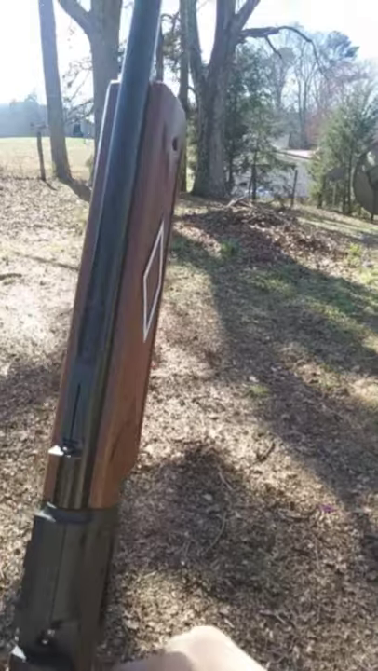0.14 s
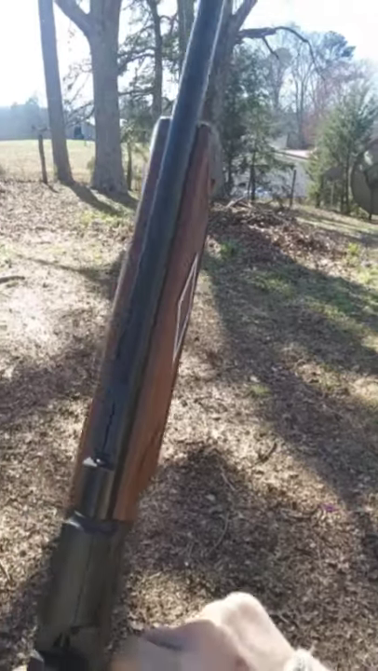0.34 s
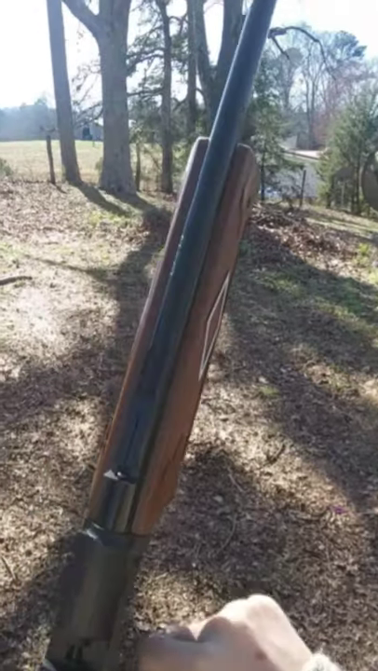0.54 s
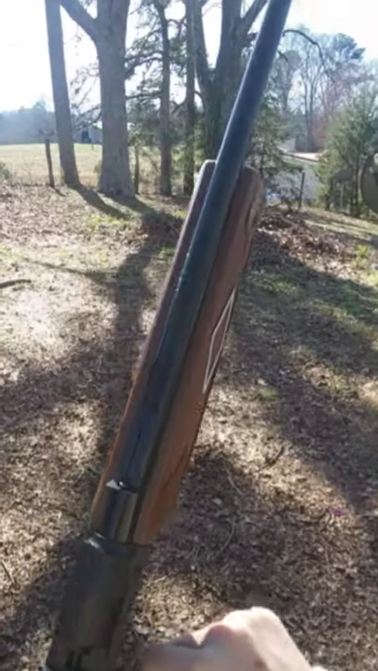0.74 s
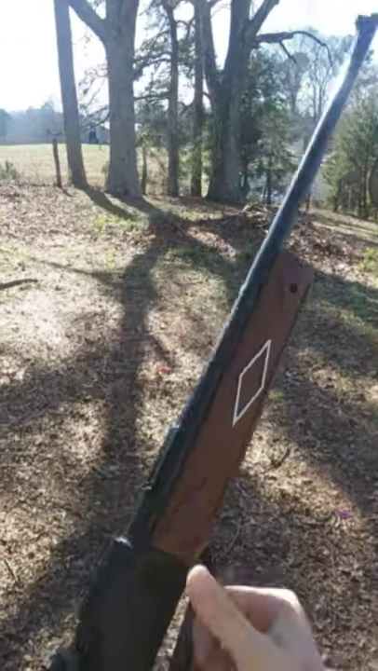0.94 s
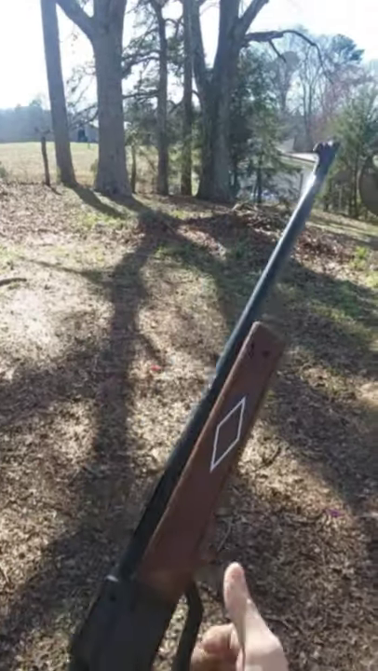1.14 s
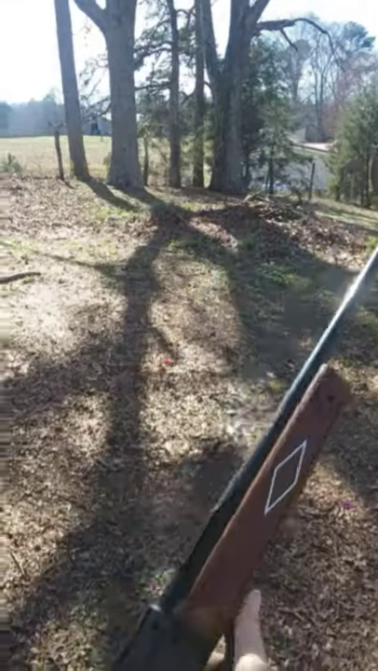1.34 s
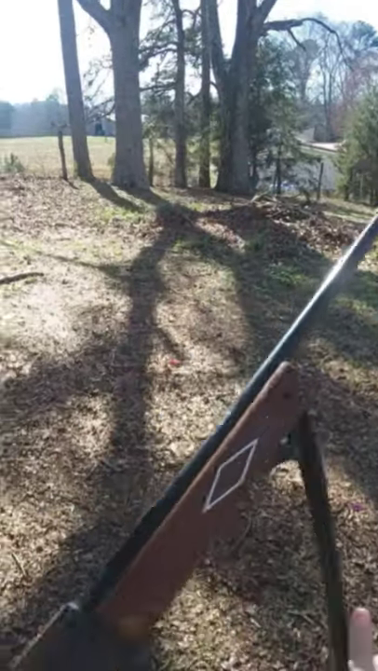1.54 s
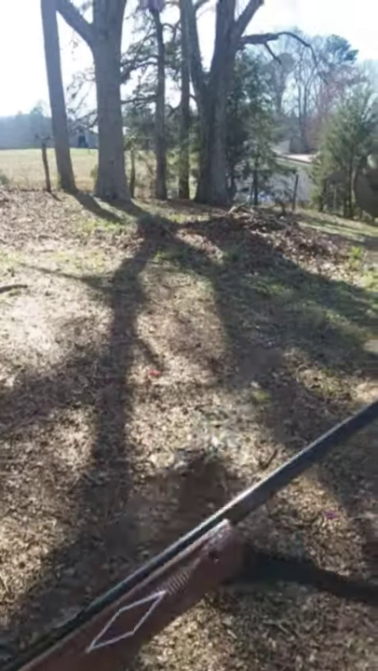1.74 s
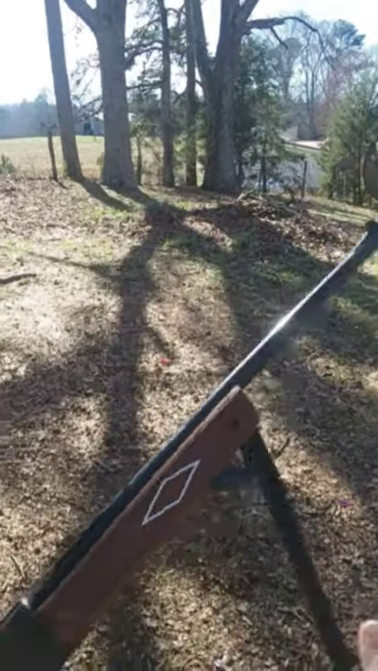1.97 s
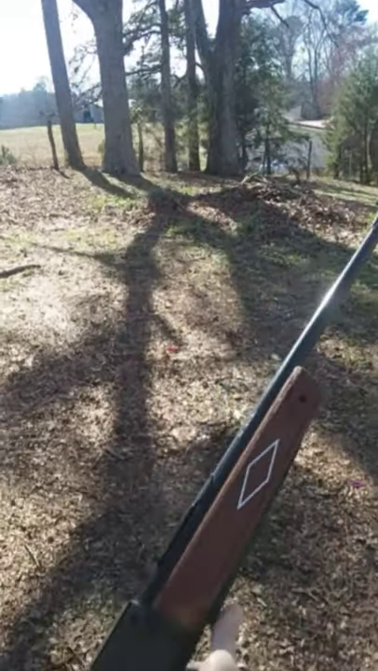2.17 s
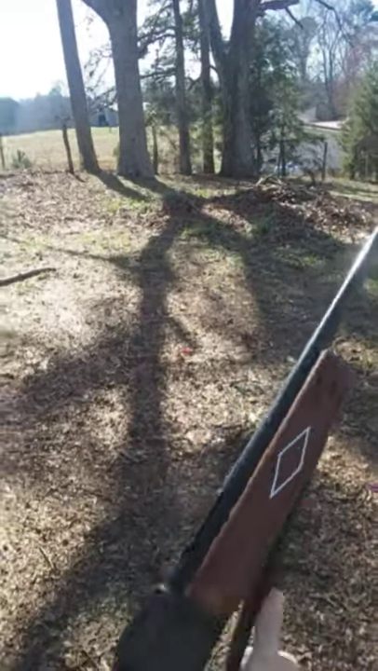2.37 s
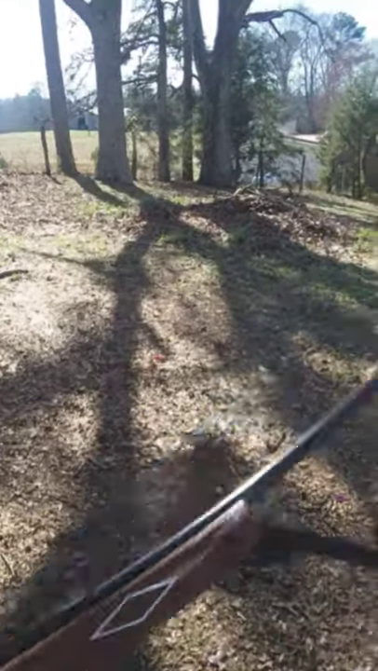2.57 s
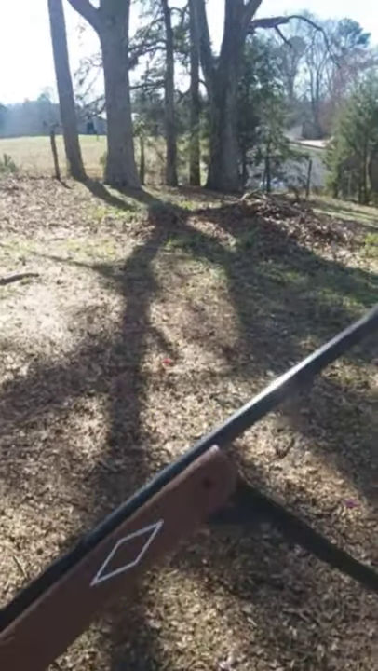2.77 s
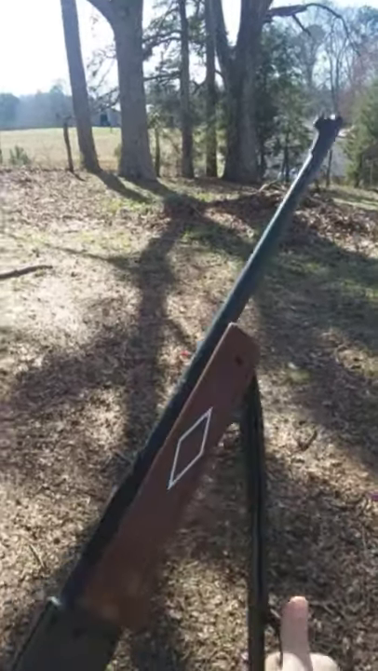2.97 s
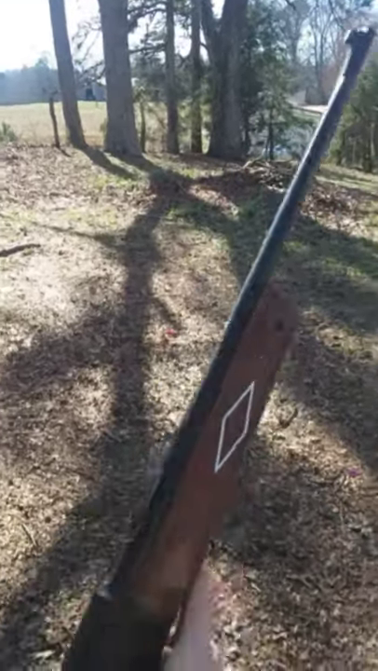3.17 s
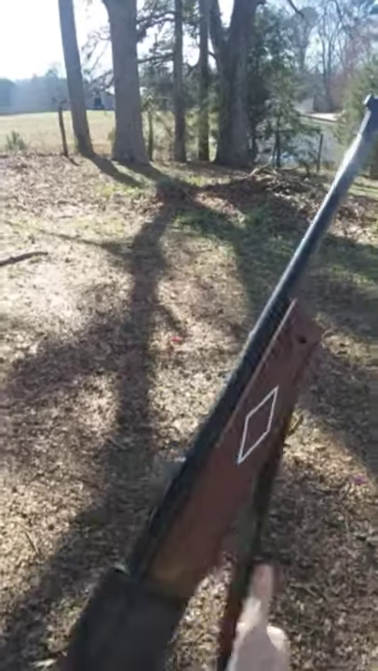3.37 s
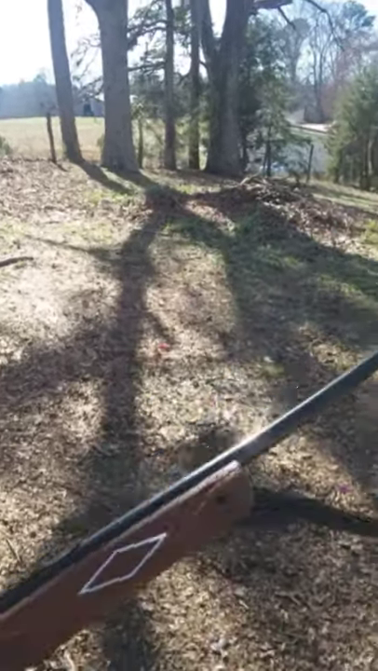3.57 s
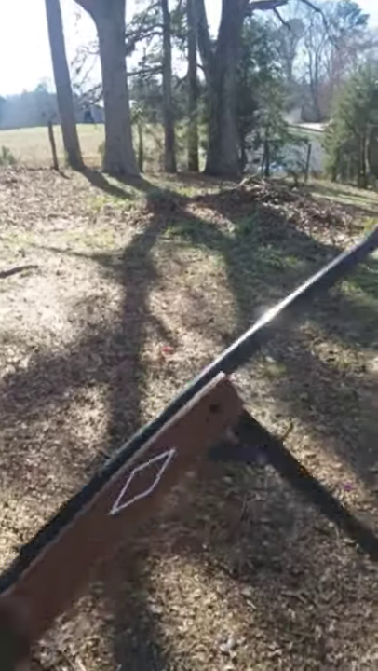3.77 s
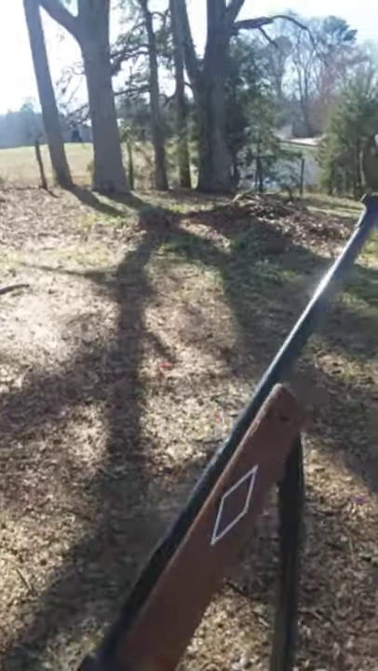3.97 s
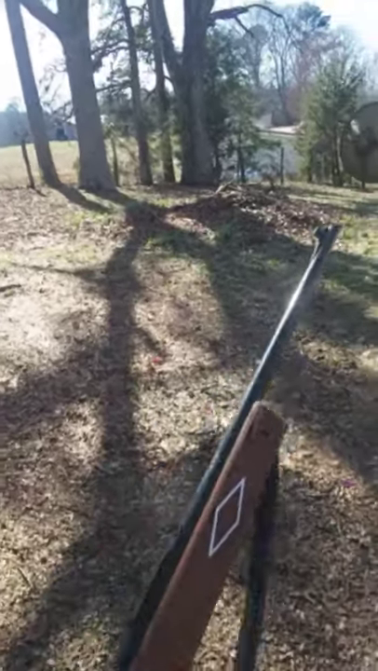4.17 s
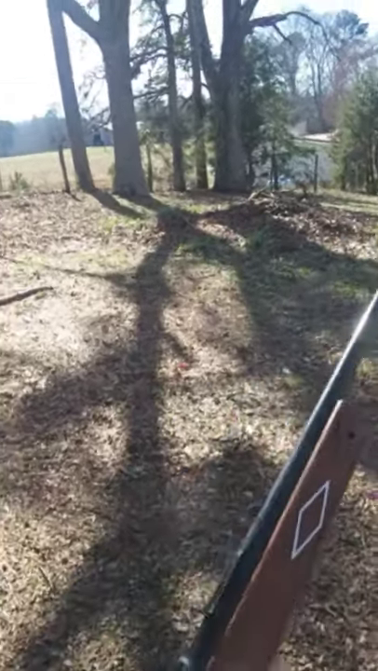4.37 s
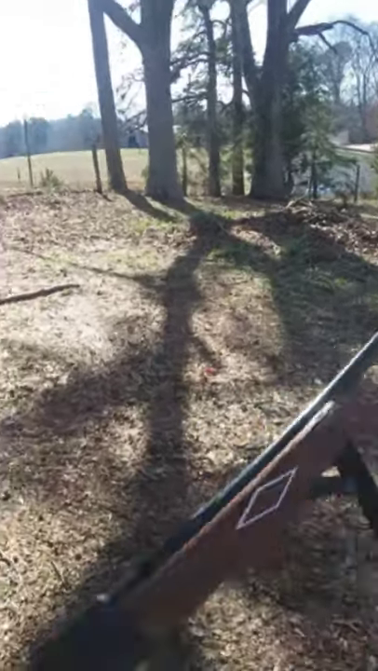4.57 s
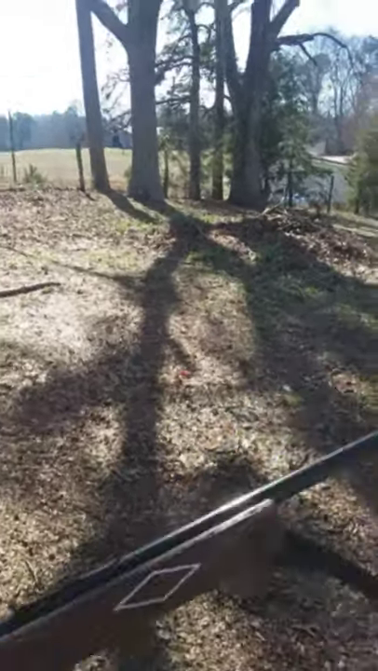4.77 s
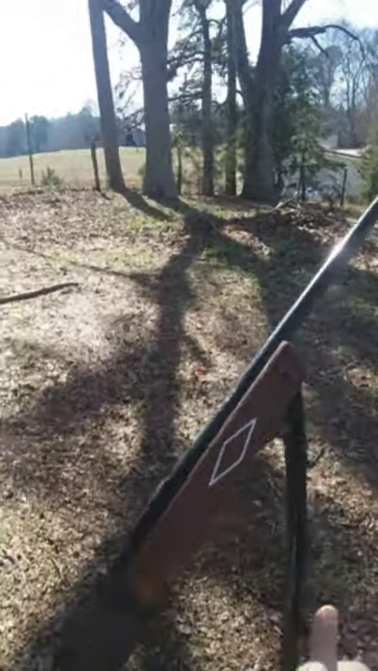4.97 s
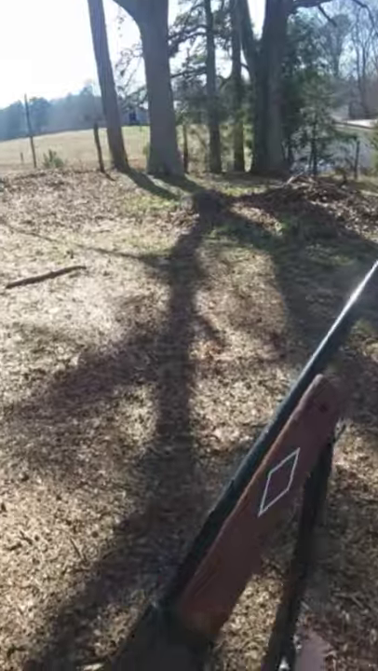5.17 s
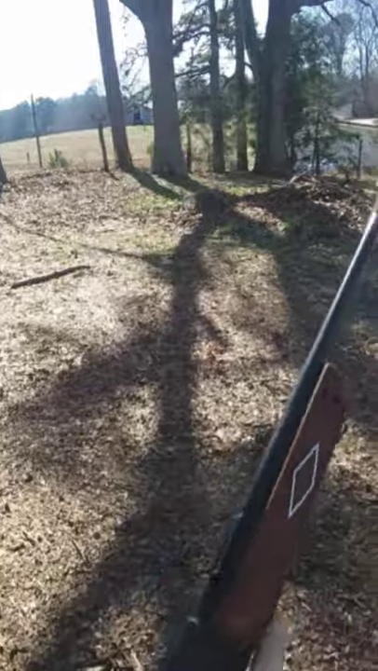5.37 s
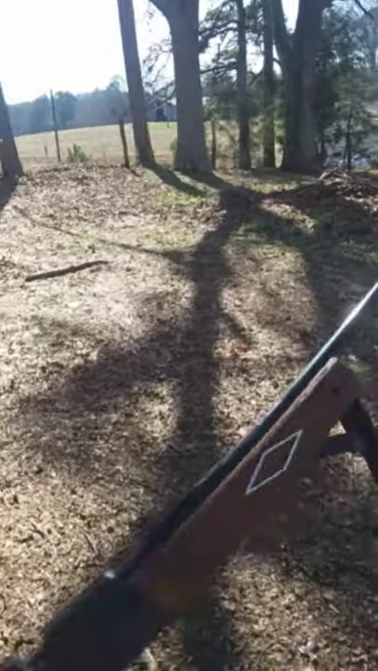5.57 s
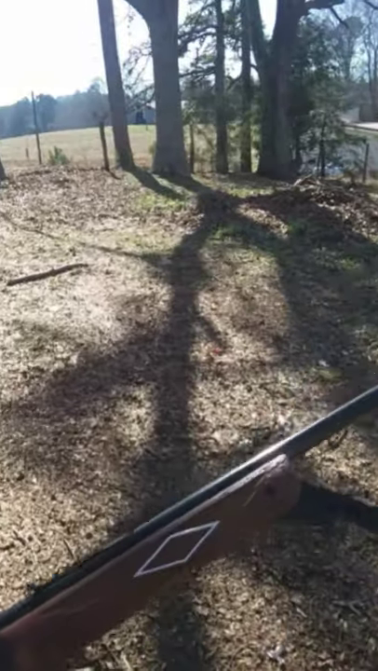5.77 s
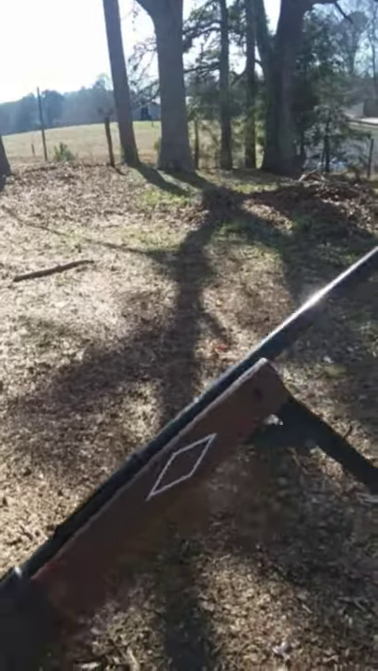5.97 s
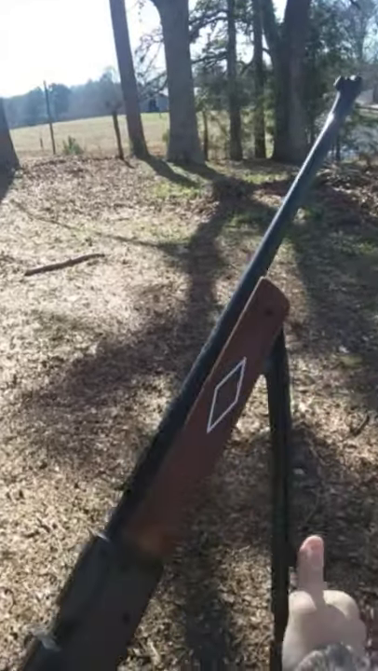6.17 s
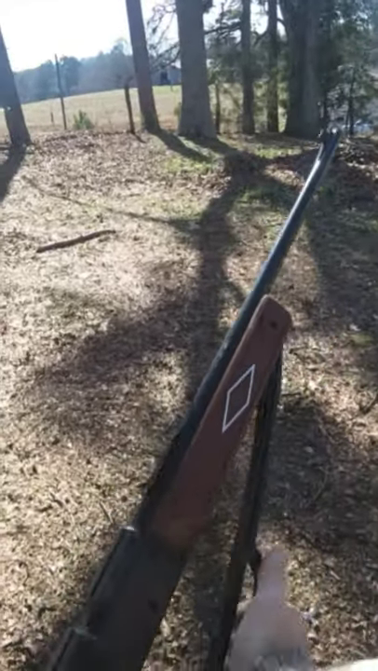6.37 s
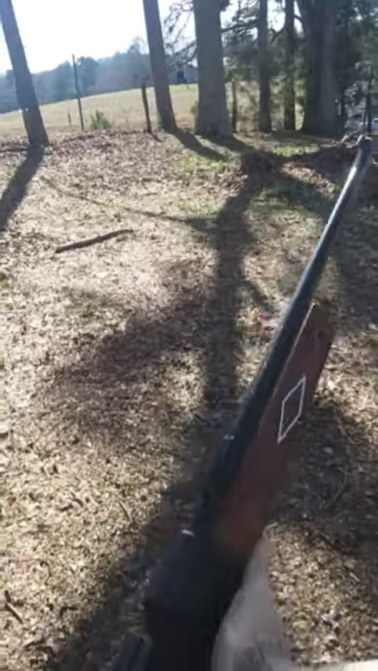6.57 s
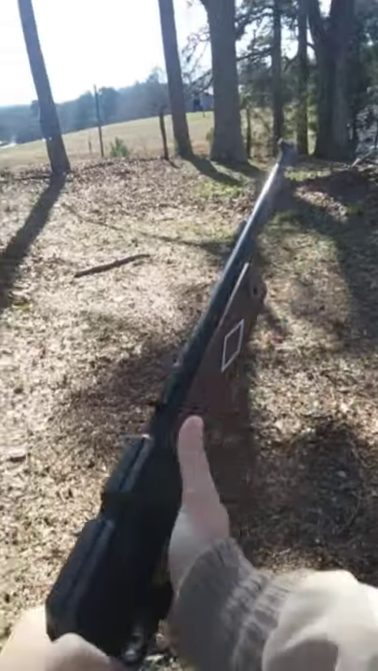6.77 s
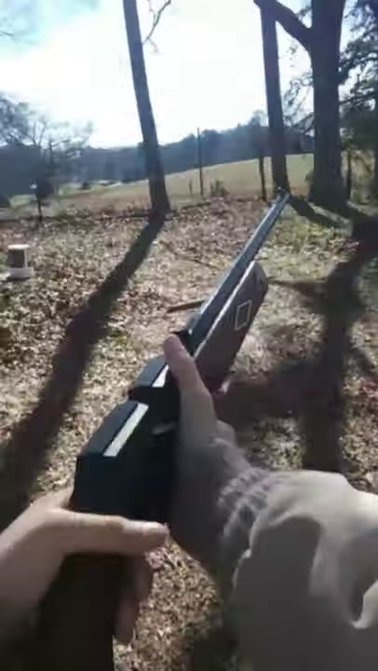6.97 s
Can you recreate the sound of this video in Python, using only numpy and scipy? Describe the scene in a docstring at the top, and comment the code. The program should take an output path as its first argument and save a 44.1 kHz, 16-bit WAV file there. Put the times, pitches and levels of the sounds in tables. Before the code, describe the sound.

A quick cluster of bright bolt clicks opens, then near quiet, then a run of squeaky pivot ticks. The lever snaps free and is pumped five times in steady rhythm, opening with a double knock and closing with a hard, slightly overloaded slap. Steel scraping and fluttering air fill the gaps. Dry, close outdoor sound with very faint echoes.

```python
"""Pumping an air rifle

An air rifle is cocked and pumped five times, close to the microphone in a quiet yard.
Bolt, lever and latch are noise bursts ringing through stock and steel; creaks and rubs are stick-slip noise.
Air flutters in the pump tube, pops in at the inlet and faintly sings at the seal.
The hardest blows overload the microphone; a sleeve rustles as the rifle is raised."""
import sys
import numpy as np
from scipy import signal
from scipy.io import wavfile
from scipy.ndimage import uniform_filter1d

SR = 44100
rng = np.random.default_rng(int(sys.argv[2]) if len(sys.argv) > 2 else 0)


def to_wav(s):
    """Save 16-bit WAV."""
    ch = np.atleast_2d(s).T  # columns
    pcm = np.round(np.clip(ch, -1, 1) * 32767)  # PCM
    wavfile.write(sys.argv[1], SR, pcm.astype(np.int16))


N = 309141
TIME = np.arange(N) / SR
BINS = np.fft.rfftfreq(4096, 1 / SR)

# Event levels are nominal: the source functions add their own trims.
# snaps of the bolt and of the lever coming free: start_s, stock_db, steel_db, stock_hz, steel_hz
SNAPS = [(0.2338, -38, -30, 1860, 2890), (0.2486, -30, -27, 1270, 5500), (0.253, -38, -16.5, 1200, 4710),
         (0.2565, -21.5, -20.5, 1350, 3200), (0.2613, -23, -24, 1410, 4140), (0.276, -18.5, -9, 1170, 3260),
         (1.4878, -18, -17.5, 1880, 4260), (1.4956, -19.5, -22, 1300, 3470),
         (1.5047, -18.5, -21, 1250, 3270), (4.4713, -22, -22, 1380, 2960),
         (5.4731, -15.5, -20.5, 1330, 2900)]
# the lever slaps shut, bounces, and its latch catches and seats: slap_s, bounce_s, catch_s, seat_s,
# slap_db, bounce_db, catch_db, seat_db, stock_hz, steel_hz, brightness_db, scrape_db
SLAPS = [(2.1796, 2.1835, 2.2014, 2.209, -10, -23, -16, -16.5, 1180, 3750, 2.5, -31.5),
         (3.1664, 3.1718, 3.184, 3.1901, -10.5, -13.5, -21.5, -12.5, 1490, 3000, -1, -34.5),
         (4.2513, 4.2626, 4.2789, 4.2893, -9, -14.5, -15.5, -16.5, 1000, 3500, .5, -29),
         (5.2463, 5.2556, 5.3072, 5.319, -10.5, -14.5, -20, -16.5, 1350, 3850, 1.5, -30),
         (6.4795, 6.49, 6.515, 6.5223, -11, -11.5, -16, -15, 1120, 3800, -.5, -35)]
# how those four contacts ring: steel_over_stock_db, steel_hz_share
SLAP_RING = [(-5, 1), (-2, .97), (-4.5, .87), (1.5, .8)]
# second strike against the slap: stock_db, steel_db, steel_hz_share
SLAP_PLAY = (-5.5, -6, .9)
# the lever hits its stop, fully open: start_s, stock_db, steel_db, stock_hz, scrape_db, scrape_length_s
STOPS = [(1.7033, -21, -18.5, 1270, -34, .38), (2.5866, -17, -18.5, 1320, -28, .125),
         (3.574, -19, -17.5, 1250, -34.5, .07), (4.6915, -20.5, -19.5, 1380, -32.5, .18),
         (5.6956, -17.5, -16.5, 1420, -28.5, .115)]
# first touch against the full blow on the stop: stock_db, steel_db, stock_hz_share
STOP_TOUCH = (-3.5, -1.5, 1.22)
# soft knocks of loose parts and hands on the stock: start_s, level_db, resonance_hz
KNOCKS = [(0.875, -38, 900), (1.31, -28, 1220), (1.358, -36.5, 1690), (1.452, -28, 1390),
          (1.561, -30.5, 1670), (1.737, -27.5, 1420), (1.941, -32, 990), (2.365, -29.5, 1280),
          (2.407, -25.5, 895), (2.471, -28.5, 1520), (2.682, -34, 1350), (2.708, -34, 1500),
          (3.353, -26.5, 1165), (3.386, -24, 895), (3.602, -29, 1300), (3.611, -26, 1260),
          (3.645, -32.5, 1480), (3.705, -30.5, 1130), (4.497, -27.5, 1300), (4.52, -37, 970),
          (4.644, -31.5, 1480), (4.729, -24.5, 1240), (4.881, -29.5, 1270), (5.387, -34, 2620),
          (5.497, -33, 950), (5.519, -36, 990), (5.84, -31, 1350), (6.398, -47.5, 1140), (6.555, -33, 610)]
# loudest single slips of the dry pivots: start_s, level_db
TICKS = [(0.9071, -32), (0.9752, -24), (0.9981, -28), (1.0129, -21), (1.0342, -24.5), (1.0415, -24),
         (1.0482, -28), (1.0804, -23), (1.1135, -22.5), (1.1157, -25), (1.165, -24), (1.204, -25),
         (1.2564, -25), (1.334, -33), (1.3591, -33), (1.454, -27.5), (1.5581, -26), (1.598, -31),
         (1.6313, -25.5), (1.6603, -27), (1.717, -27), (1.7988, -28), (1.929, -28.5), (1.995, -30.5),
         (2.261, -30), (2.6506, -23.5), (2.7686, -30), (2.7914, -31.5), (2.8473, -22.5), (2.873, -29.5),
         (2.893, -32), (3.5838, -24.5), (3.6866, -32), (3.8814, -33), (3.892, -33), (4.0873, -34),
         (4.7377, -24.5), (5.5632, -28.5), (5.8262, -34)]
# the lever drags on its pivot: start_s, length_s, level_db
CREAKS = [(.86, .07, -51), (.95, .275, -37.5), (1.23, .16, -44.5), (1.432, .03, -38), (1.52, .17, -45),
          (1.99, .1, -46), (2.36, .025, -35), (2.795, .015, -42), (2.86, .06, -45), (3.35, .015, -35),
          (3.6, .02, -37), (3.68, .025, -43), (4.978, .045, -41)]
# the piston rubs again part way through a stroke: start_s, length_s, level_db
RUBS = [(3.872, .11, -37.5), (4.02, .115, -36.5), (4.81, .06, -37.5), (5.055, .06, -44), (5.125, .022, -35)]
# hands working on the stock: time_s, level_db
GRIP = [(.86, -54.5), (1.4, -55), (1.8, -51), (2.5, -53.5), (3.0, -61), (3.9, -56), (4.25, -62), (5.1, -56),
        (5.9, -66), (6.4, -66), (6.67, -60)]
# air moves through the pump tube once in each closing stroke: peak_s, level_db, rise_s, fall_s
DRAUGHTS = [(1.962, -40.5, .045, .15), (2.875, -43, .08, .1), (3.82, -37.5, .03, .09),
            (4.934, -39, .055, .075), (6.052, -43, .05, .115)]
# the seal sings faintly: peak_s, level_db
SINGS = [(2.312, -43), (3.09, -46), (6.028, -42)]
# the piston uncovers the inlet and air pops in: start_s, stock_db, steel_db, stock_hz, steel_hz, scrape_db
POPS = [(2.4368, -16, -13, 1520, 3360, -38), (3.426, -17.5, -10.5, 1200, 3610, -41),
        (4.5446, -15.5, -13.5, 1100, 3180, -34), (5.547, -16.5, -15.5, 1240, 3580, -35)]
# sleeve rustle: time_s, level_db
SLEEVE = [(6.64, -50), (6.662, -58.5), (7.01, -49)]

# tone of the hollow stock when struck: frequency_hz, gain_db
STOCK = [(40, -34.5), (200, -25), (330, -16.5), (450, -11), (680, -5.5), (950, -1), (1350, 0.5),
         (1900, -0.5), (2600, -0.5), (5000, -49)]
# tone of the steel when struck: frequency_hz, gain_db
STEEL = [(300, -37), (1500, -18), (2400, 1), (3000, 1), (3500, -4.5), (4400, 3), (5800, -0.5), (7500, -5.5),
         (11000, -16.5), (16000, -23)]
# tone of the slipping pivot: frequency_hz, gain_db
PIVOT = [(60, -49), (260, -29), (800, -19), (1300, -11), (2300, -15), (3400, -1.5), (4600, -2),
         (5900, -0.5), (7500, -10), (9000, -12), (11500, -19), (16000, -28.5)]
# tone of the rubbing piston: frequency_hz, gain_db
RUB = [(500, -32.5), (1500, -6.5), (2300, -2.5), (2900, -0.5), (4500, 2.5), (5700, 0), (7000, -3),
       (9500, -12), (12000, -20), (16000, -29)]
# tone of the stock grinding under the hands: frequency_hz, gain_db
GRIP_TONE = [(40, -28), (150, -32), (300, -13), (500, -3.5), (750, -5.5), (1050, 0), (1450, -0.5),
             (2000, -6), (2800, -11.5), (5000, -45)]
# tone of air in the pump tube: frequency_hz, gain_db
TUBE = [(150, -53), (500, -10.5), (680, -13), (900, -9.5), (1020, 4.5), (1200, -1.5), (1380, -2),
        (1650, -4), (2000, -7.5), (2500, -14.5), (5000, -27), (12000, -44)]
# tone of cloth on cloth: frequency_hz, gain_db
CLOTH = [(88, -49), (150, -39), (348, -5), (624, -6), (871, -5), (1020, -2), (1450, -3), (3290, -12),
         (6260, -11.5), (16000, -42)]
# tone of the outdoor hush: frequency_hz, gain_db
YARD = [(24, -97.5), (40, -49), (151, -33), (180, -22.5), (269, -17), (433, -17), (615, -7.5), (663, -12.5),
        (831, -4.5), (896, -9.5), (1550, -22), (7360, -34), (14500, -39), (16000, -29.5)]
# resonances of the steel tube and linkage: frequency_hz, width_hz, lift_db
BARREL = [(2290, 43, 5.5), (2840, 160, 4.5), (3300, 120, 3), (4090, 220, 1.5), (4600, 100, 0),
          (5470, 120, 5.5), (5870, 220, 2.5), (6800, 670, 2.5), (7860, 200, 2), (9230, 500, 3)]
# long, faint ring of the hollow stock: frequency_hz, width_hz, lift_db
HOLLOW = [(402, 17, 4.5), (1026, 33, 4), (1376, 29, 2)]
# places where steel scrapes on steel: resonance_hz, width_hz, lift_db, level_db
CONTACTS = [(3680, 720, 5.5, -7), (6070, 1300, 4, -4.5), (10800, 12000, 14.5, -5)]

YARD_DB = -60.5
LATCH_HZ = 1350  # stock resonance under the bounce, the latch and the slap's second strike
STOP_STEEL_HZ = 4550  # the stop's own ring
PLAY_S = .0023  # play in the linkage: it strikes again this long after the lever
# the piston scrapes on after each blow, falling in level over that length
SLAP_RUB_S, SLAP_RUB_FALL_DB = .13, 8
POP_RUB_S, POP_RUB_FALL_DB = .11, 6.5
STOP_FALL_DB, RUB_FALL_DB, CREAK_FALL_DB = 13, 5, 3
ATTACK_S, RELEASE_DB_PER_S = .012, 380  # all piston and pivot friction sets in and dies like this
RUN_IN_DB, RUN_IN_S = -17, .009  # friction swelling around a blow: level against its stock, rise and fall
GRIND_DB = -9.5  # wood's share of the piston's push
LIGHT_RUB_DB = -4.5  # steel's share of the hands' work
STRAY_PER_S, STRAY_DB, STRAY_SPREAD_DB = 60, 3.5, 2.2  # stray slips: pace, level over the drag, spread
SWELL_DB = 17  # how far a swell climbs in its rise and drops in its fall
SING_HZ, SING_BEND_HZ = 1405, 90  # note near its loudest, and how much flatter it is toward silence
SING_RISE_S, SING_FALL_S = .035, .045


def amp(db):
    """Gain from dB."""
    return 10 ** (np.asarray(db) / 20)


def evened(x):
    """Scales to rms 1."""
    return x / np.sqrt(np.mean(x ** 2) + 1e-20)


def sized(x, db):
    """Gives a hit the energy of four milliseconds at this level."""
    return amp(db) * x * np.sqrt(.004 * SR / np.sum(x ** 2))


def add(mix, s, sound):
    """Mixes a sound in at time s."""
    part = mix[max(round(s * SR), 0):][:len(sound)]
    part += sound[:len(part)]


def level(rows):
    """Gain along a dB curve, fading out at its ends."""
    s, db = np.transpose(rows)
    inside = uniform_filter1d(1. * (TIME > s[0]) * (TIME < s[-1]), size=500)
    return inside * amp(np.interp(TIME, s, db))


def swell(s, db, rise_s, fall_s):
    """Gain that climbs to a peak at time s and drops again."""
    away = np.maximum((s - TIME) / rise_s, (TIME - s) / fall_s)
    return amp(db - SWELL_DB * np.minimum(away, 10))


def shape(points):
    """Spectrum in dB on all bins, drawn through points on a log frequency axis."""
    hz, db = np.transpose(points)
    return np.interp(np.log(BINS + 1), np.log(hz), db)


def bump(hz, width, db):
    """One resonance in dB, down to half its lift at the edges of its width."""
    return db / (1 + (2 * (BINS - hz) / width) ** 2)


def colour(x, db):
    """Causal minimum-phase filter with the given gain: it rings after each click, never before."""
    log_gain = np.log(amp(np.r_[db, db[-2:0:-1]]))
    taps = np.fft.ifft(np.exp(np.conj(signal.hilbert(log_gain)))).real
    return signal.oaconvolve(x, taps[:len(db)])[:len(x)]


def wander(per_s):
    """Random motion, gliding straight between normally spread knots at this rate."""
    knots = rng.standard_normal(N // 20)
    return np.interp(TIME * per_s, np.arange(len(knots)), knots)


def burst(decay_s, ring_db, ring_s):
    """Chatter of a contact: noise that dies fast, over a weaker and longer ring."""
    t = TIME[:4096]
    decay = np.exp(-t / decay_s) + amp(ring_db) * np.exp(-t / ring_s)
    return rng.standard_normal(len(t)) * decay


def slips(per_s, spread_db, smear):
    """Stick and slip at an uneven pace: each slip is a scratch of its own size, over a steady hiss."""
    pace = per_s * amp(7.8 * wander(170))
    starts = np.diff(np.floor(np.cumsum(pace) / SR), prepend=0)
    sizes = starts * amp(spread_db * np.clip(rng.standard_normal(N), -2, 1.6))
    t = TIME[:600]
    scratch = np.exp(-t / .0013) * (1 - np.exp(-t / .0003))
    force = evened(signal.oaconvolve(sizes, scratch)[:N])
    return evened((force + smear) * rng.standard_normal(N))


def stock():
    """Tone of the hollow stock with its resonances, in dB."""
    return shape(STOCK) + sum(bump(*mode) for mode in HOLLOW)


def barrel():
    """Resonances of the steel, in dB."""
    return sum(bump(*mode) for mode in BARREL)


def yard():
    """Far, steady outdoor hush: coloured noise."""
    return amp(YARD_DB) * evened(colour(rng.standard_normal(N), shape(YARD)))


def contacts():
    """Lists every hard contact in the columns of SNAPS; slaps and stops strike twice through the play."""
    rows = list(SNAPS)
    for slap in SLAPS:
        times, levels = slap[:4], slap[4:8]
        stock_hz, steel_hz, bright_db, _ = slap[8:]
        pitches = [stock_hz, LATCH_HZ, LATCH_HZ, LATCH_HZ]
        for s, db, hz, (lead_db, share) in zip(times, levels, pitches, SLAP_RING):
            rows.append((s, db, db + lead_db + bright_db, hz, share * steel_hz))
        thud_db, crack_db, share = SLAP_PLAY
        second_steel_db = levels[0] + crack_db + bright_db
        rows.append((times[0] + PLAY_S, levels[0] + thud_db, second_steel_db, LATCH_HZ, share * steel_hz))
    thud_db, crack_db, share = STOP_TOUCH
    for s, stock_db, steel_db, hz, *_ in STOPS:
        rows.append((s, stock_db + thud_db, steel_db + crack_db, share * hz, STOP_STEEL_HZ))
        rows.append((s + PLAY_S, stock_db, steel_db, hz, STOP_STEEL_HZ))
    return rows


def blows():
    """Each blow shakes the stock and, more briefly, the steel; the more steel leads, the brighter it is."""
    out, wood, steel = np.zeros(N), stock(), shape(STEEL) + barrel()
    shine = shape([(4500, 0.081), (10000, 0.63)])  # dB of treble for each dB that the steel leads by
    for s, stock_db, steel_db, stock_hz, steel_hz in contacts():
        thud = colour(burst(0.0031, -17, 0.013), wood + bump(stock_hz, 350, 9.4))
        crack_tone = steel + bump(steel_hz, 1500, 9.1) + shine * (steel_db - stock_db)
        crack = colour(burst(.0012, -13, 0.0059), crack_tone)
        add(out, s, sized(thud, stock_db + 1.2) + sized(crack, steel_db + 0.68))
    return out


def echoes(x):
    """Ground and trees scatter a faint, dull tail: decaying noise convolved with the rifle."""
    t = TIME[:SR // 2]
    decay = np.exp(-t / .014) + amp(-8.5) * np.exp(-t / 0.049)
    scatter = rng.standard_normal(len(t)) * (t > .007) * decay
    tail = colour(scatter, shape([(1000, 1), (6000, -10), (15000, -6)]))
    return amp(-29) * signal.oaconvolve(x, tail / np.linalg.norm(tail))[:N]


def friction(s, length, db, fall_db):
    """Gain of one rub: a quick attack, a slow fall while it moves, a quick release."""
    t = np.maximum(TIME - s, 0)
    fall = fall_db * np.minimum(t / length, 1)
    release = RELEASE_DB_PER_S * np.clip(t - length, 0, 1)
    return np.minimum(t / ATTACK_S, 1) * amp(db - fall - release)


def scraping():
    """How hard the piston scrapes: set going by each slap, pop and stop, with extra rubs between."""
    runs = [(s, SLAP_RUB_S, db, SLAP_RUB_FALL_DB) for s, *_, db in SLAPS]
    runs += [(s, POP_RUB_S, db, POP_RUB_FALL_DB) for s, *_, db in POPS]
    runs += [(s, length, db, STOP_FALL_DB) for s, *_, db, length in STOPS]
    runs += [(*row, RUB_FALL_DB) for row in RUBS]
    run_in = sum(swell(s, db + RUN_IN_DB, RUN_IN_S, RUN_IN_S) for s, db, *_ in STOPS + SNAPS)
    return sum(friction(*run) for run in runs) + run_in


def creaking():
    """How hard the pivot drags."""
    return sum(friction(*row, CREAK_FALL_DB) for row in CREAKS)


def chamber(x):
    """Sound bounces twice along the pump tube, duller and weaker; the round trip wanders."""
    trip_s = .00105 * amp(1.1 * wander(7))
    loss, dulled = amp(-7.5), uniform_filter1d(x, size=3)
    return x + sum(loss ** k * np.interp(TIME - k * trip_s, TIME, dulled) for k in (1, 2))


def slide(drag):
    """Stick-slip: the pivot creaks and the piston judders; the stock grinds under the hands."""
    rub, scrape, judder = shape(RUB) + barrel(), np.zeros(N), slips(100, 3.8, 0.44)
    for hz, width, lift_db, db in CONTACTS:
        share = amp(2.6 * wander(110))  # the load on each contact wanders by itself
        scrape += amp(db) * evened(colour(judder * share, rub + bump(hz, width, lift_db)))
    creak_tone = shape(PIVOT) + bump(5200, 2500, 4) + bump(11500, 1800, 7)
    creak = evened(colour(slips(130, 4, 0.27), creak_tone))
    push, hands = scraping(), level(GRIP)
    piston = evened(chamber(scrape)) * np.hypot(push, amp(LIGHT_RUB_DB) * hands)
    grind = evened(colour(slips(110, 4.7, 1.0), shape(GRIP_TONE) + bump(1400, 130, 3)))
    wood = grind * np.hypot(amp(GRIND_DB) * push, hands)
    return amp(-4) * creak * drag + amp(-.4) * piston + wood


def knocks():
    """Light contacts ring the hollow stock with only a trace of steel."""
    out, wood, steel = np.zeros(N), stock() + bump(480, 200, 7), shape(STEEL)
    for s, db, hz in KNOCKS:
        contact = burst(0.004, -10.5, 0.0053)
        body = colour(contact, wood + bump(hz, 300, 16.1))
        add(out, s, sized(body, db - .5) + sized(colour(contact, steel), db - 11.5))
    return out


def ticks(drag):
    """A pivot sticks and lets go: sharp clicks, each with its own steel ring; strays follow the drag."""
    out, pivot, count = np.zeros(N), shape(PIVOT) + barrel(), 500
    gaps, sizes = rng.uniform(.3, 1.7, count), rng.standard_normal(count)
    times = np.cumsum(gaps) / STRAY_PER_S
    drag_db = 20 * np.log10(np.interp(times, TIME, drag) + 1e-9)
    levels = drag_db + STRAY_DB + STRAY_SPREAD_DB * np.minimum(sizes, 2)
    for s, db in TICKS + list(zip(times, levels)):
        low, high = rng.standard_normal(2)
        slip = burst(.0012, -9.5, 0.0043)
        slip[0] += 2.5  # sharp edge of the release
        if db > YARD_DB:  # leave out those quieter than the yard
            ring = bump(5100 + 550 * low, 1500, 7.5) + bump(11000 + 1200 * high, 1500, 7)
            add(out, s, sized(colour(slip, pivot + ring), db))
    return out


def air():
    """Air flutters through the tube and rings it; the seal sings a sine, sharpest when loudest."""
    tube = shape(TUBE) + bump(1030, 55, 5.8) + bump(1390, 80, 7.5)
    flutter = evened(colour(slips(130, 4, 0.94), tube))
    flow = sum(swell(*row) for row in DRAUGHTS)
    song = sum(swell(s, db, SING_RISE_S, SING_FALL_S) for s, db in SINGS)
    pressure = sum(swell(s, 0, SING_RISE_S, SING_FALL_S) for s, _ in SINGS)
    hz = SING_HZ + SING_BEND_HZ * (np.sqrt(pressure) - 1) + 20 * wander(54)
    tone = evened(np.sin(2 * np.pi * np.cumsum(hz) / SR) * amp(2 * wander(80)))
    return amp(3.0) * flutter * flow + amp(-4.4) * tone * song


def pops():
    """The air swells for a few milliseconds as the inlet opens, and cracks as the tube fills."""
    out, t = np.zeros(N), TIME[:4096] - .02
    puff = np.exp(np.minimum(t / 0.0023, -t / 0.0027))
    puff += amp(-29) * np.exp(np.minimum(t / 0.0087, -t / 0.015))  # slower, fainter skirt
    for s, stock_db, steel_db, stock_hz, steel_hz, _ in POPS:
        low, high = rng.standard_normal((2, len(t))) * puff
        thud = colour(low, shape(STOCK) + bump(stock_hz, 300, 4.5))
        crack = colour(high, shape(STEEL) + barrel() + bump(steel_hz, 1600, 11.4))
        add(out, s + t[0], sized(thud, stock_db) + sized(crack, steel_db))
    return out


def sleeve():
    """Cloth brushes over cloth: dense small slips over hiss."""
    return amp(0.5) * evened(colour(slips(700, 2.1, 2.4), shape(CLOTH))) * level(SLEEVE)


def scene():
    """The rifle close by, its faint echoes, the sleeve and the yard."""
    drag = creaking()
    rifle = blows() + pops() + knocks() + ticks(drag) + slide(drag) + air()
    return (rifle + echoes(rifle) + sleeve() + yard())[None]


def overload(x):
    """A hard knee that holds peaks under 0.67 of full scale."""
    return x / (1 + (x / .67) ** 6) ** (1 / 6)


def record(dry):
    """The microphone overloads a little lopsidedly, thumping low under the hardest blows; then a low-pass."""
    bias = 0.031
    clipped = overload(dry + bias) - overload(bias)
    low_pass = signal.firwin(255, 16100, window=("kaiser", 9), fs=SR)  # cutoff in Hz
    return signal.oaconvolve(clipped, low_pass[None], "same")


dry = scene()
out = record(dry)
to_wav(out)
```